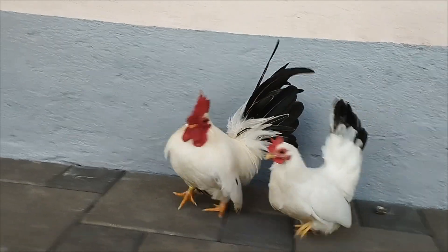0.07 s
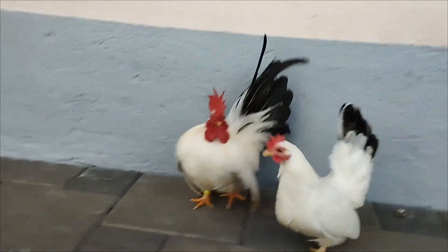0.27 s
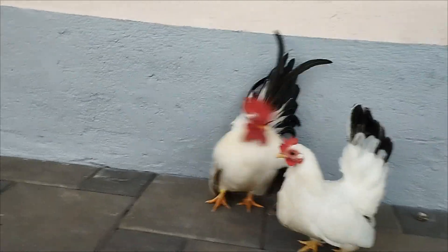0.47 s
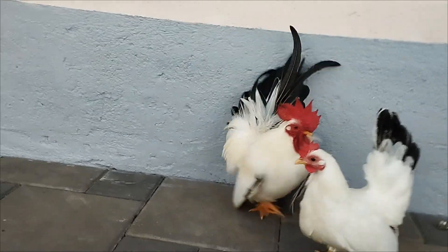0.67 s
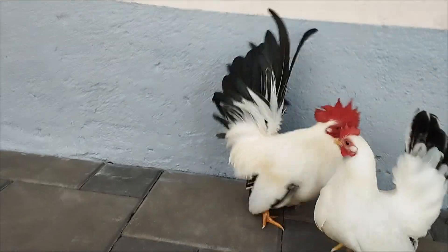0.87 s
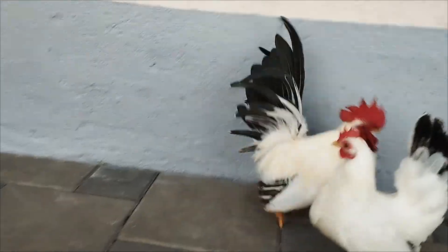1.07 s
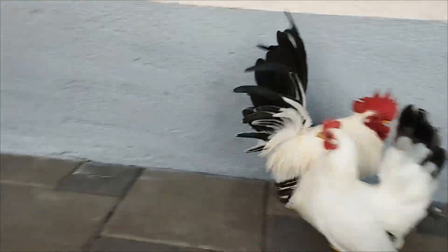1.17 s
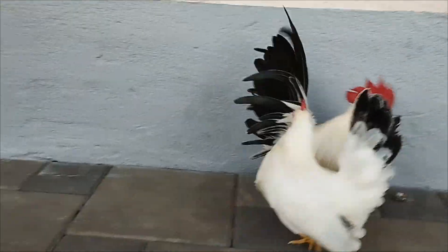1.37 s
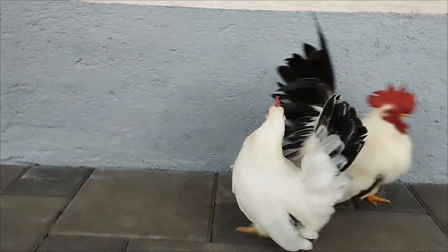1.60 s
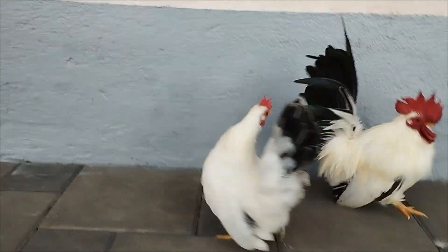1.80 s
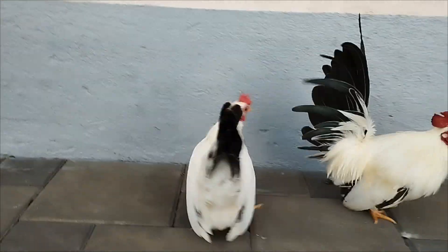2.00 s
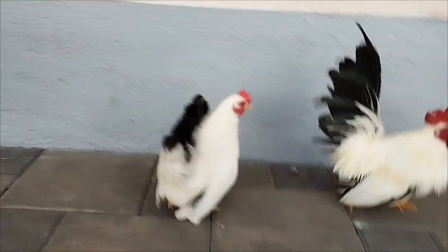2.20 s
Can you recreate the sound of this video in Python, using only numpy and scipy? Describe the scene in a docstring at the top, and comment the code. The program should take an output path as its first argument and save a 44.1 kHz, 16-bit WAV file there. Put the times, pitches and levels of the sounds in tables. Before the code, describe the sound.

Small chickens cluck softly, rustling their feathers and scuffing their feet on paving.

```python
"""On paving beside a wall, two bantams (small chickens) shuffle about close by.
They trade short high clucks and low soft ones, each a buzz of the voice box shaped by the throat.
Feathers brush and feet scuff in runs of tiny catches, a wing flicks with a thump of air,
and claws tick and ring on the stone. The wall and paving send back a short, dull echo.
A faint held note, like a far-off crow, sounds over a low outdoor rumble."""
import sys
import numpy as np
from scipy import signal
from scipy.fft import rfft, irfft
from scipy.io import wavfile

SR = 44100
rng = np.random.default_rng(int(sys.argv[2]) if len(sys.argv) > 2 else 0)


def dump(signal):
    """Clip the signal to [-1, 1] and save it as 16-bit WAV at the path in sys.argv[1]."""
    limited = np.clip(np.atleast_2d(signal).T, -1, 1)
    pcm = np.round(limited * 32767).astype(np.int16)
    wavfile.write(sys.argv[1], SR, pcm)


N = 99225
T = np.arange(N) / SR

# How strong the lows and highs of each sound are: f/Hz, level/dB
AIR_COLOUR = [(12, -43), (20, 7.5), (78, -1), (581, -19.5), (788, -20), (1130, -29), (1670, -40),
              (1820, -36), (2760, -44.5), (3640, -42), (8400, -56.5), (13900, -54.5), (15500, -50)]
FEATHER_COLOUR = [(150, -33.5), (300, -5.5), (620, -4), (922, -6.5), (1620, -4), (2210, -8), (2800, -7),
                  (4720, -9.5), (5570, -11), (7500, -14), (8280, -25.5), (9800, -14.5), (11000, -28.5),
                  (12500, -15.5), (15000, -12.5), (15600, -37)]
WING_COLOUR = [(100, -2), (300, 1), (460, -28), (610, 5.5), (800, -4.5), (1500, -21.5)]
PAVING_COLOUR = [(100, -2.5), (200, -7.5), (400, -2), (600, -1.5), (850, 0.5), (960, 1), (1080, 1),
                 (1250, -4), (1560, -5), (1800, -0.5), (2000, 3.5), (2400, -6), (2960, -8), (5400, -12.5),
                 (5900, -9.5), (6500, -12), (7480, -11.5), (8200, -25), (9600, -10.5), (11000, -23),
                 (12200, -14), (14200, -12), (15600, -15)]
CLAW_COLOUR = [(500, -5), (1700, -8.5), (2900, -2.5), (4300, -1), (5600, -11.5), (7000, -6.5), (11000, -15),
               (13000, -8), (14500, 0.5), (16000, -7)]
HIGH_THROAT = [(580, -2), (1180, -6), (1550, -10.5), (1800, 1.5), (2300, -12), (3000, -23), (3600, -37),
               (4900, -11.5), (6500, -66)]
LOW_THROAT = [(390, 1), (800, -4), (1200, -14.5), (1700, -20), (2200, -23), (2900, -25.5), (3600, -47),
              (6000, -62)]
# How alike the two ears hear a sound: f/Hz, likeness (1 = the same)
AIR_LIKENESS = [(30, 0.75), (150, 0.86), (500, 0.55), (1500, 0.097), (8000, 0.9)]
RUB_LIKENESS = [(300, 1), (1000, 0.69), (2200, 0.33), (6000, 0.13), (8500, 0.76), (15000, 0.98)]
# How much louder a sound is on the left than on the right: f/Hz, level/dB
BODY_PAN = [(200, -.5), (1400, -0.5), (2400, -9), (4400, -8), (8000, -4), (15000, -1)]
SCUFF_PAN = [(200, 0), (1400, -1), (2400, -6), (4400, -5.5), (8000, -1), (15000, 0)]
CLAW_PAN = [(1200, 3), (2400, -9), (15000, -3.5)]
VOICE_PAN = [(400, -1), (1200, 0), (2400, -7.5), (5000, -6)]
# Only the lower part of a sound reaches the left ear late: f/Hz, share of the lag
LAG_SHARE = [(5000, 0.98), (8000, 0.026)]

# The far note's loudness: t/s, level/dB
FAR_LEVEL = [(1.3, -77), (1.43, -62), (1.6, -58.5), (1.8, -57.5), (1.95, -64.5), (2.08, -61), (2.15, -53),
             (2.19, -64.5), (2.25, -72)]
# Its pitch: t/s, f/Hz
FAR_PITCH = [(1.3, 754), (1.6, 764), (2.0, 757.4), (2.15, 781.4), (2.25, 789)]
# The tones it is made of: multiple of the pitch, level/dB
FAR_TONES = [(0.522, -4), (1.001, 1), (1.498, -21)]
# Rubs of feathers, wing and feet:
# t/s, rise/s, hold/s, time to fade 60 dB/s, level/dB, treble tilt/(dB per octave), left lag/ms
FEATHER_STROKES = [(.086, 0.035, 0.019, 0.23, -50, -2.7, 0.45), (.18, 0.05, .03, .2, -51.5, 0.5, 0.57),
                   (.229, 0.015, 0.02, 0.16, -36, -1, 0.45), (.272, .013, 0.011, 0.088, -34, 0.5, 0.41),
                   (.318, 0.022, 0.026, 0.15, -43.5, 2.2, 0.39),
                   (.42, 0.071, 0.029, 0.58, -61.5, 3.5, 0.29),
                   (.535, 0.0085, 0.065, 0.3, -50.5, 0.4, 0.26), (.68, 0.037, 0.057, 0.61, -60, -1.5, 0.23),
                   (.89, 0.067, 0.017, 0.66, -49.5, -1.2, 0.32), (1.17, 0.007, 0.013, 0.83, -50, -4, 0.26),
                   (1.41, 0.027, 0.03, 0.46, -60, 0.5, 0.066), (1.7, 0.061, 0.093, 0.71, -55, -0.2, .1),
                   (1.93, 0.032, 0.047, 0.081, -58, -1.5, 0.27), (2.14, 0.054, 0.046, .3, -57, -3.5, 0.26)]
WING_SWISH = [(.232, 0.014, 0.074, 0.14, -44.5, 0, 0.31)]
FOOT_SCUFFS = [(1.034, 0.02, 0.012, .06, -37, -2.5, 0.17), (1.062, 0.0068, 0.011, 0.084, -36, 0.5, .16),
               (1.1318, 0.0014, 0.023, 0.15, -33, -.5, .16), (1.144, 0.0038, .008, 0.057, -39, -1, 0.097)]
# Claw skids: the same columns as the rubs, then the claw's ring f/Hz
CLAW_SKIDS = [(.064, .002, 0.0038, 0.03, -66, 9, 0.11, 3700),
              (0.491, 0.0012, 0.0049, 0.02, -47.5, 1.5, 0.23, 2700),
              (.505, 0.0014, 0.0028, 0.022, -41.5, 5.5, .22, 2580),
              (0.5369, 0.00048, 0.0026, 0.015, -37.5, 1, 0.073, 3160),
              (0.883, 0.0022, 0.0044, .05, -61, 6, 0.11, 2960),
              (1.228, .0005, 0.00083, .008, -48, 4.5, 0.072, 4400),
              (1.68, 0.0022, .004, .03, -61.5, 3.5, .2, 3000),
              (1.766, 0.00096, 0.0023, 0.01, -45.5, -7.5, 0.094, 2380)]
# Soft thumps of wings and feet: t/s, level/dB, f/Hz, half the time to the peak/s, left lag/ms
THUMPS = [(.092, -39, 91, 0.0022, 0.37), (.231, -35.5, 418, 0.0021, 0.17), (.3001, -11.5, 197, .0014, 0.32),
          (.4905, -36.5, 215, 0.0011, .2), (.507, -34.5, 172, 0.00067, 0.092),
          (.538, -38.5, 248, 0.00196, .2), (.605, -41.5, 145.7, 0.0061, 0.31),
          (1.046, -29, 146, 0.0012, 0.24), (1.074, -25.5, 700, 0.00061, 0.2),
          (1.099, -35.5, 255, 0.0014, 0.11), (1.166, -35, 235, 0.002, .16),
          (1.185, -37.5, 68.6, 0.003, .16)]
# Clucks: t/s, length/s, f/Hz, glide/octaves, level/dB, overtone boost/dB, roughness (0 to 1)
HIGH_CLUCKS = [(.447, .03, 607.6, -0.096, -48, -3, 0.22), (.737, 0.015, 613.7, -0.025, -40.5, 0, 0.26),
               (.996, 0.022, 580, -0.053, -42, -6, 0.05), (1.557, .026, 566.3, 0.08, -41.5, -9, 0.11),
               (1.711, 0.021, 551, -0.03, -42.5, -10, 0.02)]
LOW_CLUCKS = [(1.241, 0.026, 475, 0.099, -41, 13, 0.53), (1.267, 0.0164, 485.4, -0.023, -53.5, 18, 0.7),
              (1.44, 0.029, 384.3, 0.035, -46, -2, .35), (1.559, 0.033, 416, -0.14, -44.5, -2, 0.26),
              (1.689, 0.046, 398.4, -0.034, -45, 5.5, 0.24),
              (1.831, 0.042, 436.4, -0.048, -41.5, 1.5, 0.17), (1.952, 0.0393, 371, -.25, -46.5, 1, .15),
              (2.062, .068, 389.7, -0.052, -44.5, -5.5, 0.077), (2.221, 0.024, 384, -0.1, -47, -4, 0.13)]


def from_db(db):
    """Turn decibels into a number to multiply by."""
    return 10 ** (np.asarray(db) / 20)


def rms_one(x):
    """Scale a sound to an average strength of 1."""
    return x / np.sqrt(np.mean(x ** 2) + 1e-20)


def at_hz(points, hz):
    """Read between a table's rows, with octaves evenly spaced."""
    f, value = np.transpose(points)
    return np.interp(np.log(np.maximum(hz, 1)), np.log(f), value)


def freqs(x):
    """List the frequencies in a sound's spectrum."""
    return np.fft.rfftfreq(x.shape[-1], 1 / SR)


def shaped(x, gain):
    """Turn each frequency up or down."""
    return irfft(rfft(x) * gain, x.shape[-1])


def drift(rate_hz, size):
    """Make a random wobble, mostly slower than rate_hz."""
    white = rng.standard_normal(size)
    return rms_one(shaped(white, 1 / (1 + (freqs(white) / rate_hz) ** 2)))


def spread(mid, side, gain, likeness):
    """Blend two unrelated noises into a left and right pair."""
    alike = np.clip(at_hz(likeness, freqs(mid)), -1, 1)
    shared = shaped(mid, gain * np.sqrt(1 + alike))
    opposed = shaped(side, gain * np.sqrt(1 - alike)) * [[1], [-1]]
    return rms_one(shared + opposed)


def placed(x, pan, lag_ms):
    """Give a sound a direction: each ear gets its own level and timing."""
    hz = freqs(x)
    side = np.array([[.5], [-.5]])
    delay_s = side * at_hz(LAG_SHARE, hz) * lag_ms / 1000
    return shaped(x, from_db(side * at_hz(pan, hz)) * np.exp(-2j * np.pi * hz * delay_s))


def add(out, start, x):
    """Mix a sound in at its start time."""
    i = int(np.clip(start * SR, 0, N - 1))
    out[:, i:i + x.shape[1]] += x[:, :N - i]


def outdoor_air(level_db=-47.5, treble_db=7.5):
    """A low rumble, much alike in both ears, lies under a faint hiss."""
    mid, side = rng.standard_normal((2, N))
    hz = freqs(mid)
    colour_db = at_hz(AIR_COLOUR, hz) + at_hz([(500, 0), (2000, treble_db)], hz)
    gain = from_db(colour_db) * np.minimum(hz / 20, 1) ** 2
    return from_db(level_db) * spread(mid, side, gain, AIR_LIKENESS)


def far_note(waver_db=2.5):
    """A long note from far away wavers a little in pitch and loudness."""
    pitch = np.interp(T, *np.transpose(FAR_PITCH))
    note = np.zeros(N)
    for multiple, db in FAR_TONES:
        cycles = multiple * np.cumsum(pitch * (1 + 0.0054 * drift(34, N))) / SR
        note += np.sin(2 * np.pi * cycles) * from_db(db + waver_db * drift(20, N))
    return np.sqrt(2) * note * from_db(np.interp(T, *np.transpose(FAR_LEVEL), left=-120))


def yard_echo(x, fade_s=0.29, delay_s=0.0068, cutoff_hz=5400, size=22050):
    """Sound bounces off the wall and paving as a short, dull echo."""
    t = np.arange(size) / SR
    tail = rng.standard_normal((2, size)) * from_db(-60 * t / fade_s) * (t > delay_s)
    dull = signal.butter(1, cutoff_hz, fs=SR, output="sos")
    tail = signal.sosfilt(dull, rms_one(tail) / np.sqrt(size))
    return signal.fftconvolve(x, tail, axes=1)[:, :N]


def rubbing(rows, colour, pan, catch_db, hiss, catches_per_s=3500, size=24000):
    """Sliding surfaces make tiny catches over a hiss; each rub swells, holds and fades."""
    out, t = np.zeros((2, N)), np.arange(size) / SR
    hz = freqs(t)
    band = np.minimum(hz / colour[0][0], 1) ** 2 * (hz < 15600)
    treble_octaves = np.log2(np.maximum(hz, 2000) / 2000)
    for start, rise, hold, fade, db, tilt_db, lag_ms in rows:
        strengths = from_db(catch_db * np.minimum(rng.exponential(1, (2, size)), 4))
        strengths *= rng.choice([-1, 1], (2, size))
        catches = rms_one(strengths * (rng.random((2, size)) < catches_per_s / SR))
        mid, side = catches + hiss * rng.standard_normal((2, size))
        # Each rub rings a little at random pitches of its own.
        ring = rng.standard_normal(size) * t * np.exp(-t / .003)
        ring_db = 3 * rms_one(rfft(ring).real)
        gain = from_db(at_hz(colour, hz) + ring_db + tilt_db * treble_octaves) * band
        judder_db = 1.8 * drift(90, size)
        fade_db = 60 * np.maximum(t - rise - hold, 0) / fade
        loudness = np.clip(t / rise, 0, 1) * from_db(db + judder_db - fade_db)
        add(out, start, placed(loudness * spread(mid, side, gain, RUB_LIKENESS), pan, lag_ms))
    return out


def feathers():
    """Feathers brush together and a wing swishes past."""
    strokes = rubbing(FEATHER_STROKES, FEATHER_COLOUR, BODY_PAN, catch_db=4.5, hiss=1.0)
    return strokes + rubbing(WING_SWISH, WING_COLOUR, BODY_PAN, catch_db=2, hiss=0.7)


def scuffs():
    """Feet scrape over gritty paving."""
    return rubbing(FOOT_SCUFFS, PAVING_COLOUR, SCUFF_PAN, catch_db=3.5, hiss=0.47)


def claws(ring_db=14, half_width_hz=210):
    """Each claw skids briefly on the stone and rings at its own pitch."""
    out, hz = np.zeros((2, N)), freqs(T)
    for *skid, ring_hz in CLAW_SKIDS:
        tick = rubbing([skid], CLAW_COLOUR, CLAW_PAN, catch_db=2.5, hiss=0.88)
        out += shaped(tick, 1 + from_db(ring_db) / (1 + ((hz - ring_hz) / half_width_hz) ** 2))
    return out


def thumps(overtone_ratio=3.055, overtone_db=-10.5, size=4096):
    """A wing or foot pushes the air, which swings a couple of times and settles."""
    out, t = np.zeros((2, N)), np.arange(size) / SR
    for start, db, hz, swell, lag_ms in THUMPS:
        loudness = from_db(db) * (t / swell / 2) ** 2 * np.exp(2 - t / swell)
        phase = 2 * np.pi * hz * t
        swing = -np.sin(phase) + from_db(overtone_db) * np.sin(overtone_ratio * phase)
        add(out, start, placed(loudness * swing, BODY_PAN, lag_ms))
    return out


def clucks(rows, throat, rise_s=0.0047, fall_s=0.005, sag_octaves=0.047, shake_hz=160, size=8192):
    """The voice box buzzes briefly; roughness shakes its pitch and strength and adds rasp."""
    out, t = np.zeros((2, N)), np.arange(size) / SR
    f = freqs(t)
    for start, length, hz, glide, db, boost_db, rough in rows:
        along = np.minimum(t / length - .5, .5)  # -0.5 at the start, 0.5 at the end
        pitch = hz * 2 ** (glide * along - sag_octaves * (2 * along) ** 2)
        pitch *= 1 + 0.15 * rough * drift(shake_hz, size)
        phase = 2 * np.pi * np.cumsum(pitch) / SR
        buzz = np.cos(phase)
        for k in range(2, 14):  # each overtone flickers on its own
            overtone = np.cos(k * phase + rng.uniform(0, 2 * np.pi))
            buzz += overtone * from_db(3.5 * (1 - 1 / k) * drift(45, size))
        puffs = rng.standard_normal(size) * (1 + np.cos(phase))  # one puff of noise per cycle
        rasp = 0.67 * rough * np.sqrt(SR / 2 / hz) * puffs
        shake = 1 + 0.75 * rough * drift(shake_hz, size)
        colour_db = at_hz(throat, f) + at_hz([(800, 0), (1840, boost_db)], f)
        bass_cut = np.minimum(f / (0.71 * hz), 1) ** 4
        voice = shaped((np.sqrt(2) * buzz + rasp) * shake, from_db(colour_db) * bass_cut)
        loudness = from_db(db) * np.clip(t / rise_s, 0, 1) * np.clip((length - t) / fall_s + .5, 0, 1)
        add(out, start, placed(loudness * voice, VOICE_PAN, lag_ms=0.13))
    return out


def scene():
    """Mix the two birds, their echo and the background."""
    voices = clucks(HIGH_CLUCKS, HIGH_THROAT) + clucks(LOW_CLUCKS, LOW_THROAT)
    rubs = feathers() + scuffs() + claws()
    knocks = thumps()
    echo = yard_echo(from_db(-7) * (voices + rubs) + from_db(-13.5) * knocks)
    return voices + rubs + knocks + echo + far_note() + outdoor_air()


def record(dry):
    """Cut the very highest treble steeply, above 15600 Hz."""
    return signal.sosfilt(signal.ellip(10, .2, 80, 15600, fs=SR, output="sos"), dry)


dry = scene()
out = record(dry)
dump(out)
```